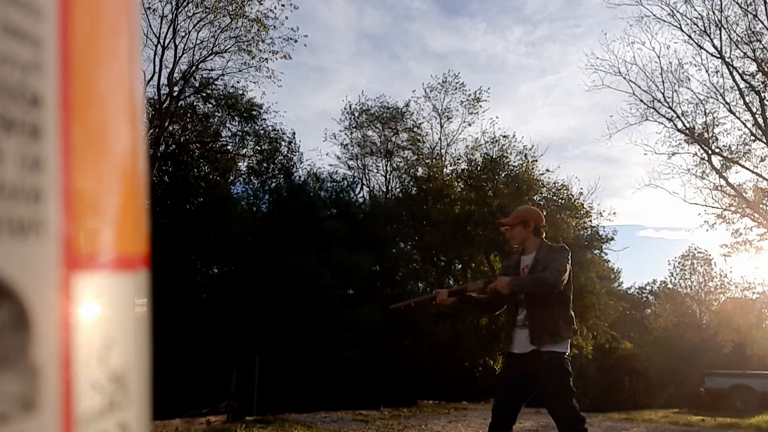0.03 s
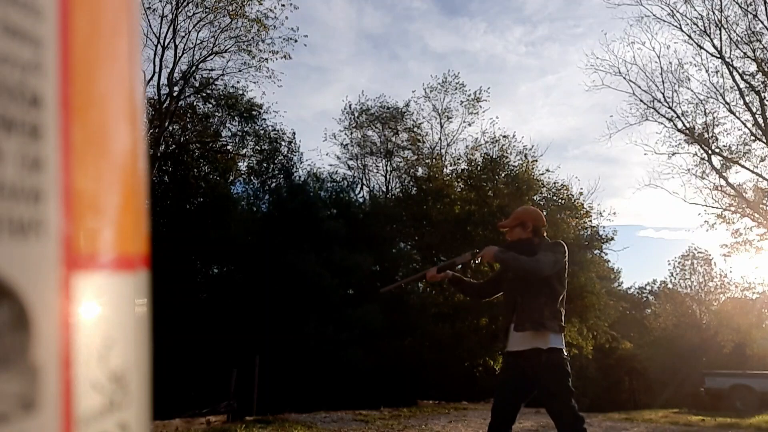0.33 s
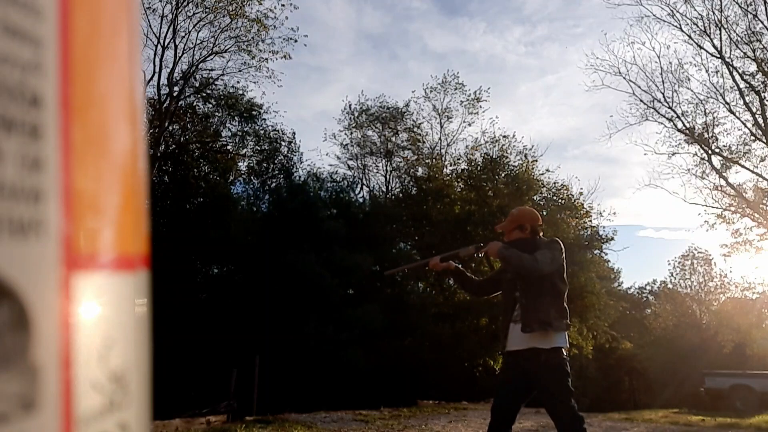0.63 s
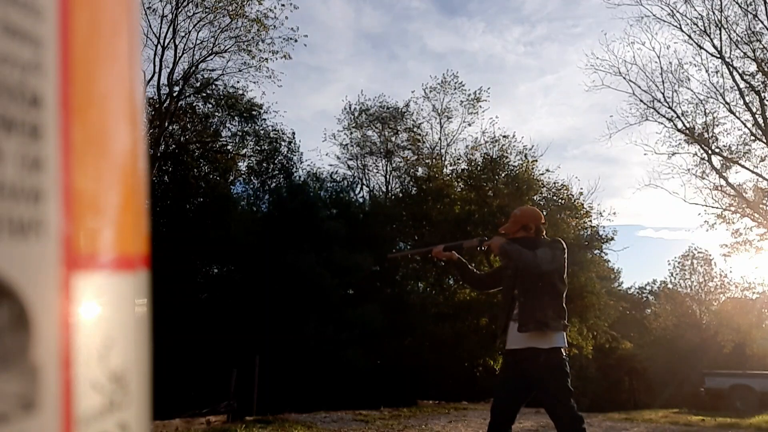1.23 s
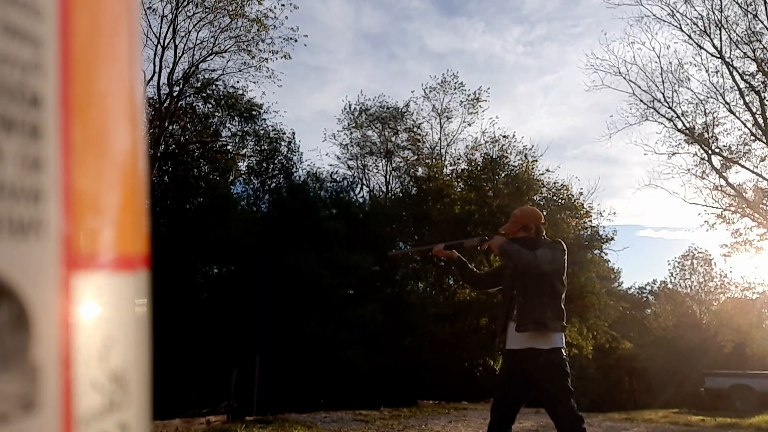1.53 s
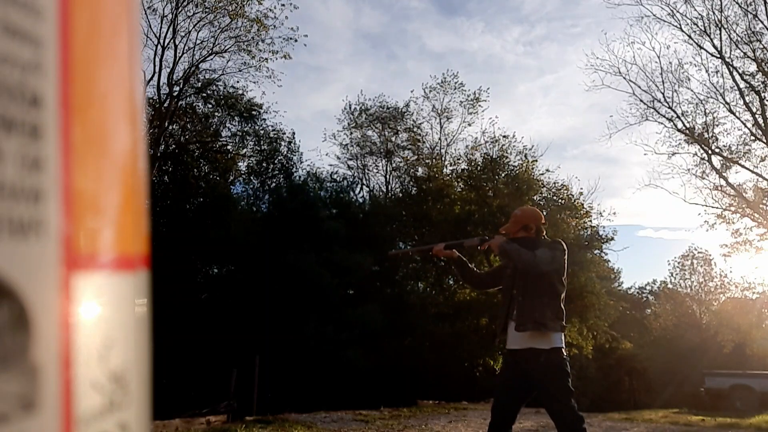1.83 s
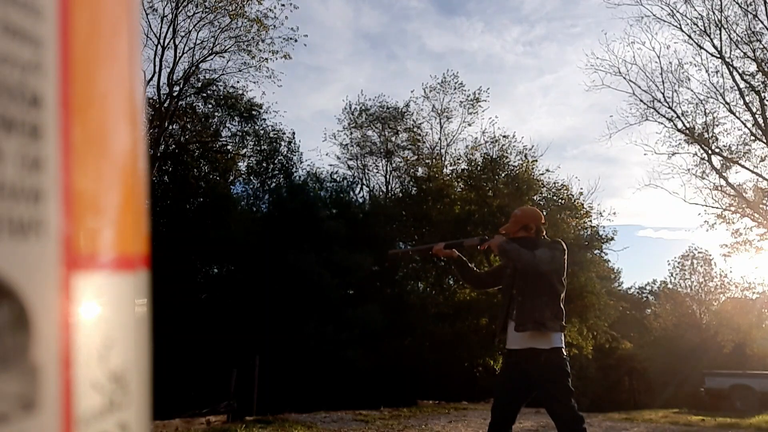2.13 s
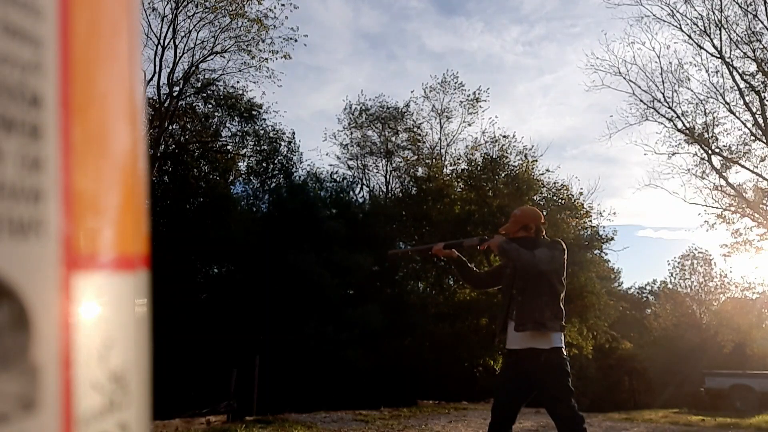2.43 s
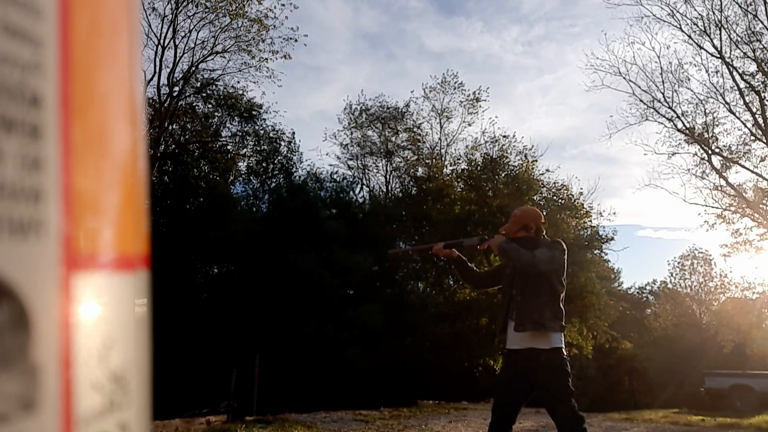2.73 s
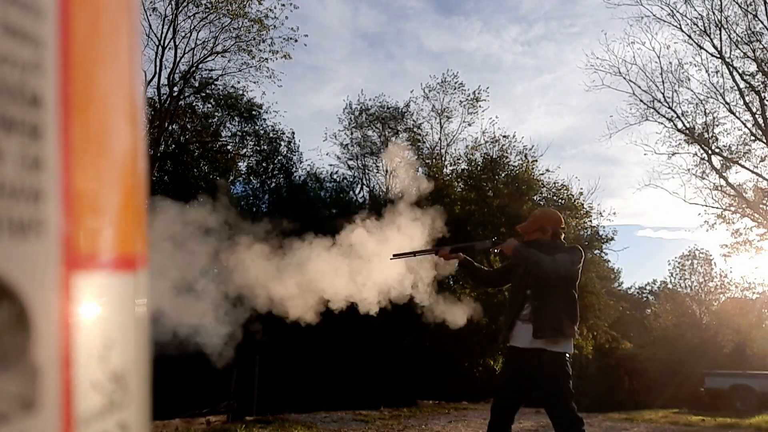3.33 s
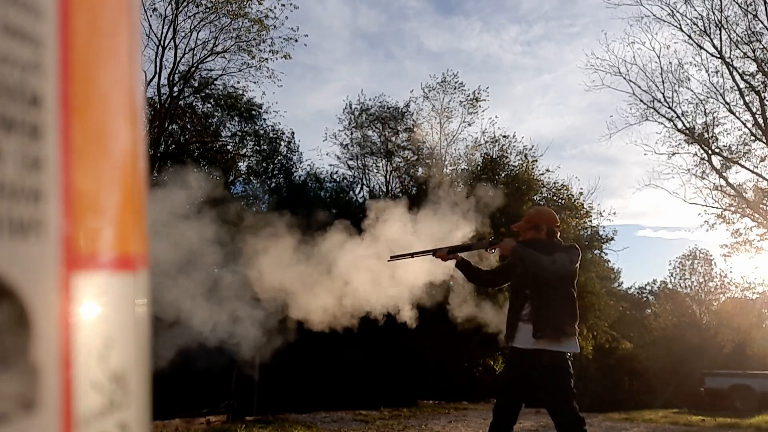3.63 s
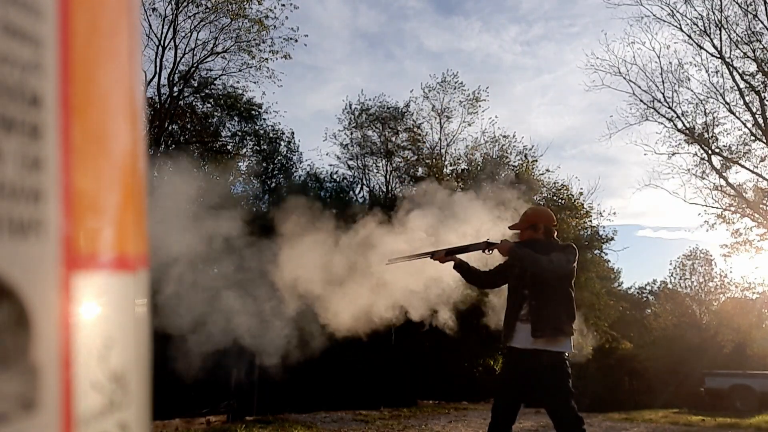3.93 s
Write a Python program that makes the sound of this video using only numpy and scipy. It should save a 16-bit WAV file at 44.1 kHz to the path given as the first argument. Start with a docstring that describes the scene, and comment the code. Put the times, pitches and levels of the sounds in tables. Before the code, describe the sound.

A rifle fires once outdoors, fairly close, with a loud crack and thump that rumbles off the surrounding woods. Before the shot there is only quiet evening air, soft crickets and one crisp click of the hammer being cocked.

```python
"""Muzzleloader shot in a clearing.

Crickets trill over evening air and a far drone. The hammer is cocked and rings the lock; two seconds
later the trigger clicks, the cap snaps and the charge goes off. Gas rushes from the muzzle, the tree
line throws the blast back, and the echo rolls away, ever duller."""
import sys
import numpy as np
from scipy import signal
from scipy.fft import rfft, irfft
from scipy.io import wavfile

SR = 44100
rng = np.random.default_rng(int(sys.argv[2]) if len(sys.argv) > 2 else 0)


def digitize_waveform(pressure):
    """Quantize a signal to 16-bit integers and store it at the path in sys.argv[1].

    Rows of a 2-D input are taken as channels; values are limited to [-1, 1].
    """
    field = np.atleast_2d(pressure).T
    bounded = np.clip(field, -1, 1)
    quanta = np.round(bounded * 32767).astype(np.int16)
    wavfile.write(sys.argv[1], SR, quanta)


N = 176400
T = np.arange(N) / SR
BIN_HZ = np.fft.rfftfreq(N, 1 / SR)


def from_db(db):
    """Decibels to gain."""
    return 10 ** (np.asarray(db) / 20)


def unit_rms(x):
    """Scale to unit power."""
    return x / np.sqrt(np.mean(x ** 2) + 1e-20)


def at_hz(points, hz):
    """Read a table on a log-frequency axis."""
    points_hz, values = np.transpose(points)
    return np.interp(np.log(np.maximum(hz, 1)), np.log(points_hz), values)


def pan(db):
    """Stereo gains for a left-minus-right level."""
    return from_db(np.array([[.5], [-.5]]) * db)


def drift(rate_hz):
    """Random wander below about rate_hz, unit RMS."""
    return unit_rms(irfft(rfft(rng.standard_normal(N)) / (1 + (BIN_HZ / rate_hz) ** 2), N))


def envelope(start_s, attack_s, hold_s, t60_s):
    """Linear rise, hold, exponential fall."""
    rise = np.clip((T - start_s) / attack_s, 0, 1)
    falling_s = np.maximum(T - start_s - attack_s - hold_s, 0)
    return rise * np.exp(-np.log(1000) * falling_s / t60_s)


def swell(start_s, length_s):
    """Half-sine rise and fall."""
    return np.sin(np.pi * np.clip((T - start_s) / length_s, 0, 1))


def tone(hz):
    """Sine following a frequency track."""
    return np.sin(2 * np.pi * np.cumsum(hz) / SR)


def noise(spectrum):
    """Coloured stereo noise at the microphone pair, unit RMS."""
    # left-right likeness: (frequency [Hz], correlation [-1 to 1])
    likeness = [(30, 0.504), (65, 0.87), (130, 0.95), (350, 0.77), (680, 0.65), (880, -0.12), (1150, -0.54),
                (1400, -0.55), (1800, 0.059), (2700, 0.39), (3300, -0.44), (4200, -0.08)]
    # balance: (frequency [Hz], left-right [dB])
    balance = [(50, -1.5), (150, -2), (350, -1), (600, -2), (1300, 2.5), (2400, 1.5), (4400, 3.5),
               (7500, -5.5), (15000, -1)]
    alike = at_hz(likeness, BIN_HZ)
    mid, side = rfft(rng.standard_normal((2, N)))
    stereo = np.sqrt(1 + alike) * mid + np.sqrt(1 - alike) * side * [[1], [-1]]
    colour = from_db(at_hz(spectrum, BIN_HZ)) * (BIN_HZ > 20)
    return unit_rms(irfft(stereo * pan(at_hz(balance, BIN_HZ)) * colour, N))


def narrow_noise(hz, width_hz):
    """Stereo noise in a Gaussian band, unit RMS."""
    band = np.exp(-.5 * np.minimum(((BIN_HZ - hz) / width_hz) ** 2, 100))
    real, imaginary = rng.standard_normal((2, 2, len(band)))
    return unit_rms(irfft((real + 1j * imaginary) * band, N))


def bands(x):
    """Overlapping bands that sum to x: (centre [Hz], signal)."""
    centres_hz = np.geomspace(50, 15000, 18)
    spectrum = rfft(x)
    return [(hz, irfft(spectrum * np.interp(BIN_HZ, centres_hz, weights), N))
            for hz, weights in zip(centres_hz, np.eye(len(centres_hz)))]


def scatter(x, tail_db=-10, t60_s=0.65):
    """Add a diffuse tail from grass and leaves."""
    tail = rng.standard_normal((2, SR // 2)) * np.exp(-np.log(1000) * T[:SR // 2] / t60_s)
    tail /= np.sqrt(np.sum(tail ** 2) / 2)
    return x + from_db(tail_db) * signal.fftconvolve(x, tail, axes=1)[:, :N]


def air():
    """Steady evening air, mostly low rumble."""
    # (frequency [Hz], relative density [dB])
    spectrum = [(25, -19.5), (45, -11.5), (85, 0.5), (130, -6), (190, -6), (260, -9), (360, -8),
                (500, -14.5), (850, -13.5), (1700, -18.5), (2200, -30.5), (3200, -32), (4300, -24.5),
                (5500, -27.5), (7500, -29), (8200, -47.5), (15500, -38.5)]
    return from_db(-59.5) * pan(3.5) * noise(spectrum)


def drone():
    """Far, wavering tones come and go."""
    # (start [s], length [s], pitch [Hz], level [dB])
    tones = [(0, 1.05, 182, -60), (1.05, .33, 182, -59.5), (2.25, .6, 182, -64), (.55, .8, 356, -66),
             (1.5, 1.2, 356, -65), (2.8, .38, 356, -60.5), (0, 4, 2556, -86)]
    waver_hz, flutter_db = 3.98, 2.2
    out = 0
    for start_s, length_s, hz, db in tones:
        hum = tone(hz + waver_hz * drift(8.9))
        out += hum * from_db(db + flutter_db * drift(4.1)) * swell(start_s, length_s)
    return out


def rustles():
    """Soft swells of midrange noise."""
    # (start [s], length [s], centre [Hz], level [dB])
    swells = [(1.54, 0.15, 1790, -68.5), (1.815, 0.16, 1810, -65.5), (2.69, .14, 1650, -68)]
    return sum(from_db(db) * swell(start_s, length_s) * narrow_noise(hz, width_hz=400)
               for start_s, length_s, hz, db in swells)


def bird():
    """Two thin, distant chips, each a raspy upward glide."""
    # (start [s], length [s], start pitch [Hz], end pitch [Hz], level [dB])
    chips = [(2.125, 0.057, 6650, 7830, -66), (2.57, 0.036, 7460, 7560, -70)]
    rasp_hz = 220
    out = 0
    for start_s, length_s, start_hz, end_hz, db in chips:
        glide_hz = np.interp(T, [start_s, start_s + length_s], [start_hz, end_hz])
        out += from_db(db) * swell(start_s, length_s) * tone(glide_hz + rasp_hz * drift(900))
    return scatter(out * pan(0))


def far_crickets():
    """Distant trills merge into fluttering bands of noise."""
    # (centre [Hz], width [Hz], level [dB])
    chorus = [(3720, 90, -67), (3775, 276, -68)]
    flutter_db = 1
    return pan(5.5) * sum(narrow_noise(hz, width_hz) * from_db(db + flutter_db * drift(4.3))
                          for hz, width_hz, db in chorus)


def wing_strokes(hz, rate_hz, start_s=0, sag_hz=340, rasp_hz=60, sharpness=1.15,
                 jitter_cycles=0.022, uneven_db=0.2):
    """One tone pulse per wing stroke, sliding down in pitch."""
    stroke = ((T - start_s) * rate_hz + jitter_cycles * drift(rate_hz / 2)) % 1
    carrier = tone(hz - sag_hz * (stroke - .5) + rasp_hz * drift(398))
    pulses = np.abs(np.sin(np.pi * stroke)) ** sharpness
    return carrier * pulses * from_db(uneven_db * drift(rate_hz / 2))


def near_insects():
    """Crickets trill in turn; a higher, slower insect ticks throughout."""
    # (start [s], length [s], pitch [Hz], stroke rate [Hz], level [dB], left-right [dB])
    trills = [(.5, .36, 3890, 37, -63, 0), (.98, .46, 3670, 36.5, -59, 7), (1.456, .42, 4080, 38.4, -50, 9),
              (2.14, .51, 3640, 36.3, -54, 4), (2.77, .045, 3680, 37, -62, 4),
              (2.9, .065, 3730, 37, -55, 4), (3.075, .095, 3730, 37, -55, 4)]
    edge_s = .02
    crickets = 0
    for start_s, length_s, hz, rate_hz, db, pan_db in trills:
        gate = np.clip(np.minimum(T - start_s, start_s + length_s - T) / edge_s, 0, 1)
        crickets += from_db(db) * pan(pan_db) * gate * wing_strokes(hz, rate_hz, start_s)
    ticks = wing_strokes(hz=6150, rate_hz=23.7, sag_hz=900, rasp_hz=120, sharpness=12,
                         jitter_cycles=0.06, uneven_db=0)
    return scatter(crickets + from_db(-69) * ticks)


def jacket():
    """Cloth rustles as the rifle is raised."""
    # (time [s], level [dB])
    movement = [(0, -60), (.2, -67), (.4, -66), (.5, -76), (.8, -100)]
    # (frequency [Hz], relative density [dB])
    spectrum = [(150, -40), (700, 3), (2000, -6), (3000, -8), (6500, -8), (9000, -29), (15000, -25.5)]
    return from_db(np.interp(T, *np.transpose(movement))) * noise(spectrum)


def woods():
    """Countless trunks return the blast as a lumpy roll; the midrange lasts longest."""
    # (frequency [Hz], relative density [dB])
    spectrum = [(32, -25), (52, 0), (90, -0.5), (145, 1.5), (220, -5), (400, -3.5), (600, -3.5), (830, 2),
                (1030, 0), (1250, 0.5), (1550, -2), (1900, 0), (2400, -6), (3300, -7), (5800, -6),
                (7500, -10.5), (9300, -33.5), (11500, -20), (15500, -22.5)]
    # (frequency [Hz], t60 [s])
    decay = [(50, 0.19), (150, 1.25), (400, 1.49), (800, 1.5), (1300, 1.735), (2500, 1.124), (5500, 0.88),
             (8000, 0.65), (14000, 0.4)]
    lumps_db = 0.5 * drift(46)   # common to all bands
    out = 0
    for hz, band in bands(noise(spectrum)):
        fade = envelope(3.293, attack_s=0.0049, hold_s=0.022, t60_s=at_hz(decay, hz))
        patches_db = 0.94 * drift(16.5)
        out += band * fade * from_db(lumps_db + patches_db)
    return from_db(-13.5) * pan(1.5) * out


def tree_stands():
    """Stands of trees return swells of the blast, each in its own register."""
    # (start [s], length [s], centre [Hz], width [Hz], level [dB])
    swells = [(3.311, .012, 1700, 348, -16.5), (3.336, 0.024, 1840, 250, -17.5),
              (3.338, 0.015, 840, 110, -15.5), (3.387, 0.019, 647, 110, -18),
              (3.475, .065, 1470, 400, -28.5), (3.513, .028, 1360, 350, -21),
              (3.601, .075, 1410, 383, -30.5), (3.712, .12, 260, 109.6, -42)]
    return sum(from_db(db) * swell(start_s, length_s) * narrow_noise(hz, width_hz)
               for start_s, length_s, hz, width_hz, db in swells)


def echoes():
    """Larger surfaces return short, dulled slaps."""
    # (time [s], level before low-pass [dB], cutoff [Hz], left-right [dB])
    reflections = [(3.261, -5.5, 890, 11), (3.2835, -10, 2480, -4), (3.296, -13.5, 12100, -3),
                   (3.335, -7, 4900, 3), (3.403, -16, 3020, 2)]
    # (frequency [Hz], relative density [dB])
    spectrum = [(50, -16), (150, 0), (500, 3.5), (1250, -5.5), (2500, -9), (6500, 1.5), (9300, -34),
                (12000, -4), (15500, -8.5)]
    out, source = 0, noise(spectrum)
    for start_s, db, cutoff_hz, pan_db in reflections:
        slap = source * envelope(start_s, attack_s=0.00033, hold_s=0.0012, t60_s=0.029)
        lowpass = signal.butter(2, cutoff_hz, fs=SR, output="sos")
        out += from_db(db) * pan(pan_db) * signal.sosfilt(lowpass, slap + 1e-18)
    return out


def ring(start_s, hz, build_s):
    """A mode builds to height 1 while the parts slide home, then is quickly damped."""
    t = T[:SR // 20]
    shape = (t / build_s) ** 2 * np.exp(2 * (1 - t / build_s))
    return np.pad(shape * np.sin(2 * np.pi * hz * t), (int(start_s * SR), N))[:N]


def lock():
    """Hammer and trigger ring lock and stock; the mainspring rings on after cocking."""
    # (time [s], level [dB], tilt about 1 kHz [dB/octave], left-right [dB])
    clicks = [(1.2126, -25, 0, 5.5), (3.196, -49.5, 2.5, 6)]
    # lock and stock: (frequency [Hz], relative level [dB], build-up [s])
    modes = [(696, -7.5, 0.0023), (1083, -1, 0.0019), (1810, -12.5, 0.0017), (2650, -19, .0013),
             (3830, -8, 0.00089), (4700, -14.5, .0011), (5630, -9.5, 0.0014), (6285, -16.5, 0.0016),
             (6830, -10, 0.0011), (7340, -18, .0011), (8400, -18.5, .0008), (10900, -23, .0008),
             (14000, -20, .0005)]
    # scatter off the ground: (frequency [Hz], relative density [dB])
    tail_spectrum = [(300, -13), (700, 3.5), (1200, 6), (2500, -5), (4000, -3), (7300, -7), (9000, -22),
                     (15000, -16.5)]
    spring_hz, spring_db, tail_relative_db = 277.5, -57, -20.5
    ringing, tail = 0, 0
    for start_s, db, tilt_db, pan_db in clicks:
        for k, (hz, mode_db, build_s) in enumerate(modes):
            gain = from_db(db + mode_db + tilt_db * np.log2(hz / 1000))
            ringing += (-1) ** k * gain * pan(pan_db) * ring(start_s, hz, build_s)
        fade = envelope(start_s, attack_s=0.00033, hold_s=.001, t60_s=0.17)
        tail += from_db(db + tail_relative_db) * fade
    cocked_s = clicks[0][0]
    spring = from_db(spring_db) * np.sin(2 * np.pi * spring_hz * T)
    spring *= envelope(cocked_s, attack_s=0.0049, hold_s=0.17, t60_s=0.3)
    return ringing + spring + tail * noise(tail_spectrum)


def cap():
    """The percussion cap snaps just ahead of the charge."""
    # (frequency [Hz], relative density [dB])
    spectrum = [(200, -24), (1100, -1), (2500, -22), (5600, -2), (7500, -6), (9500, -22), (15000, -17)]
    snap = envelope(3.2243, attack_s=0.00028, hold_s=0.001, t60_s=0.0071)
    return from_db(-22.5) * pan(11.5) * noise(spectrum) * snap


def boom():
    """The gas cloud thumps, and more thumps come back along the ground."""
    # (time [s], pitch [Hz], level [dB], t60 [s])
    thumps = [(3.2288, 130, -22.5, .06), (3.248, 320, -10.5, 0.036), (3.259, 100, -20, .065),
              (3.278, 193, -20, .11), (3.306, 90, -12, 0.057), (3.329, 253, -17.5, .06)]
    waver = 0.115   # fraction of pitch
    out = 0
    for start_s, hz, db, t60_s in thumps:
        thump = tone(hz * (1 + waver * drift(hz)) * (T > start_s))
        out += from_db(db) * thump * envelope(start_s, attack_s=0.0049, hold_s=0, t60_s=t60_s)
    return out


def shot(start_s=3.229):
    """The muzzle blast cracks and loses its treble first; gas rushes out after it."""
    # (frequency [Hz], relative density [dB])
    blast_spectrum = [(50, -18.5), (200, -3), (400, -1.5), (850, 2.5), (1400, 0.5), (2400, -7.5),
                      (4000, -4.5), (7000, -5.5), (9200, -25), (12000, -15), (15500, -11)]
    # (frequency [Hz], t60 [s])
    blast_decay = [(100, 0.19), (700, 0.12), (2000, 0.097), (6000, 0.038), (14000, 0.085)]
    # gas and its scatter off the ground: (frequency [Hz], relative density [dB])
    rush_spectrum = [(30, -35), (60, -2), (180, -11), (310, 2.5), (600, -5), (1300, -4), (2600, -13.5),
                     (6500, -18.5), (8000, -20.5), (9300, -45.5), (11500, -26.5), (15500, -30)]
    blast = sum(band * envelope(start_s, attack_s=0.00028, hold_s=0.0024, t60_s=at_hz(blast_decay, hz))
                for hz, band in bands(noise(blast_spectrum)))
    rush = noise(rush_spectrum) * envelope(start_s, attack_s=0.018, hold_s=0.046, t60_s=0.29)
    return pan(2.5) * (from_db(-9.5) * blast + from_db(-19.5) * rush)


def scene():
    """The rifle, its echoes and the clearing."""
    rifle = lock() + cap() + shot() + boom()
    reflections = woods() + tree_stands() + echoes()
    wildlife = near_insects() + far_crickets() + bird()
    return rifle + reflections + wildlife + air() + jacket() + rustles() + drone()


def record(dry):
    """Brief opening silence, soft-clipped peaks, steep low-pass."""
    start_s, fade_s, ceiling, stopband_hz = 0.081, 0.009, 0.9, 16800
    fade_in = np.clip((T - start_s) / fade_s, 0, 1)
    clipped = ceiling * np.tanh(dry / ceiling)
    lowpass = signal.cheby2(16, 70, stopband_hz, fs=SR, output="sos")
    return signal.sosfilt(lowpass, fade_in * clipped)


dry = scene()
out = record(dry)
digitize_waveform(out)
```